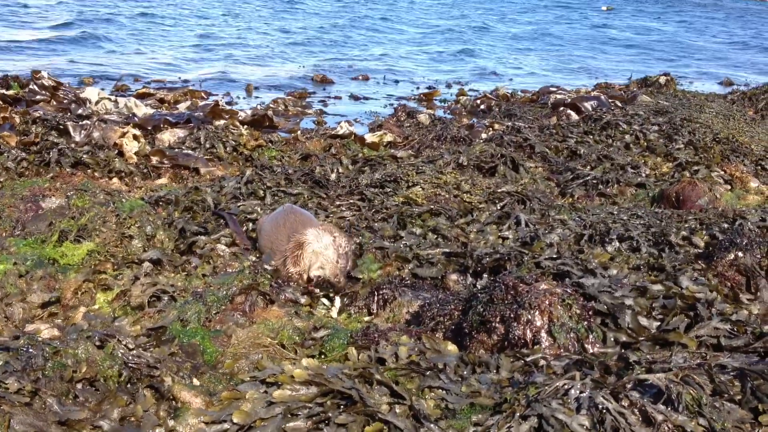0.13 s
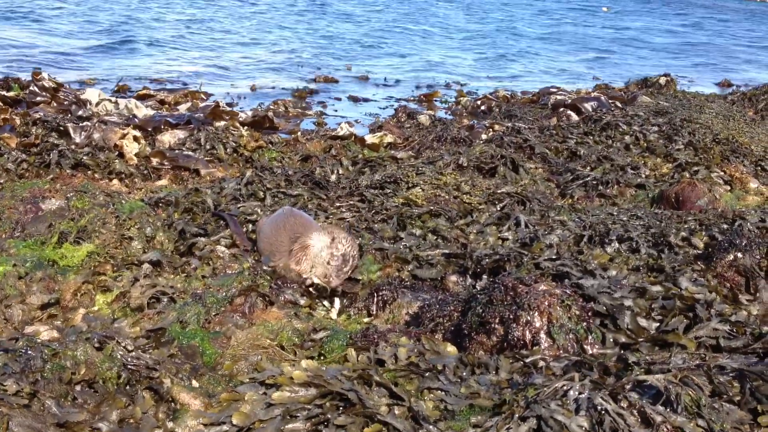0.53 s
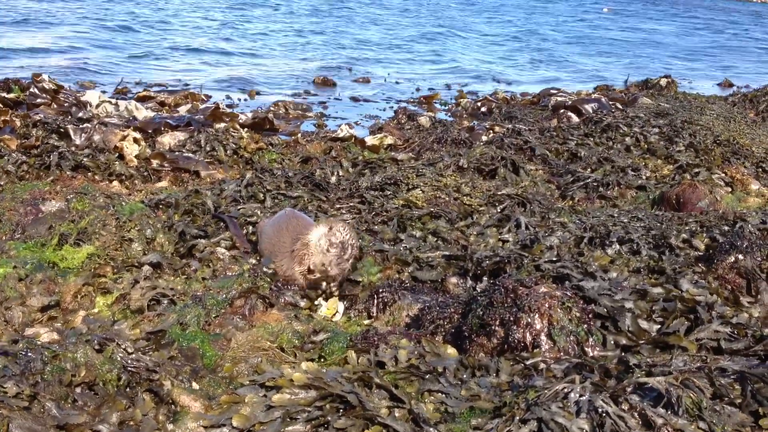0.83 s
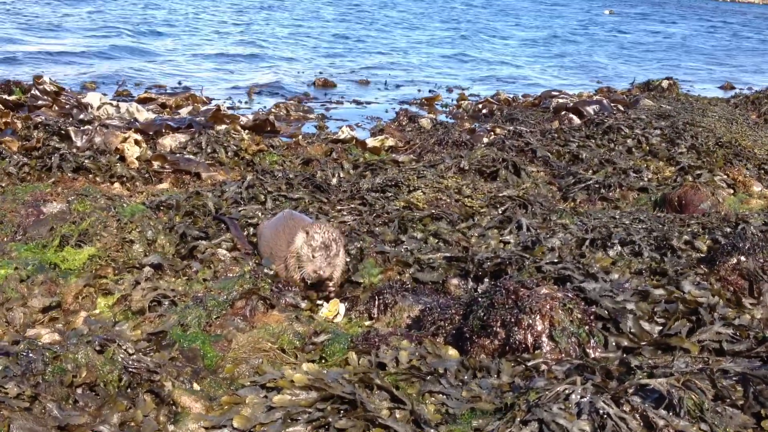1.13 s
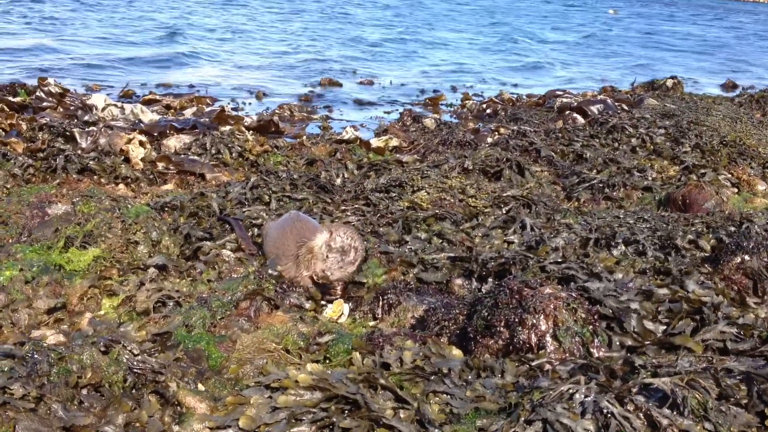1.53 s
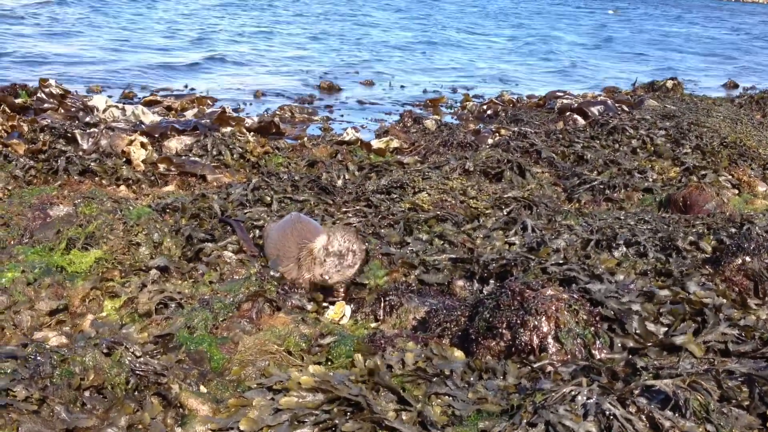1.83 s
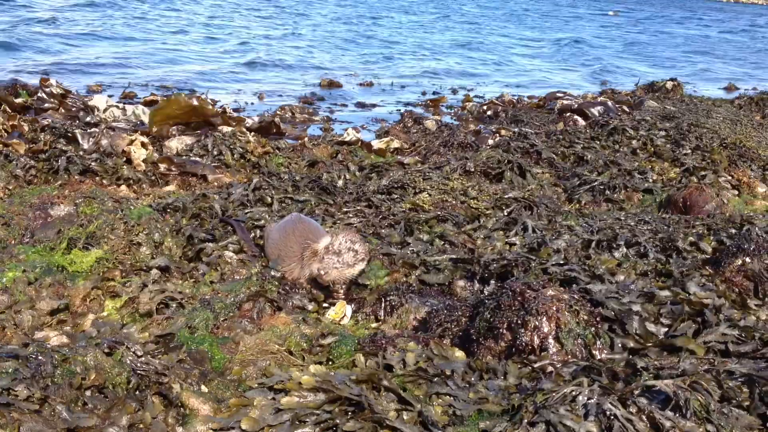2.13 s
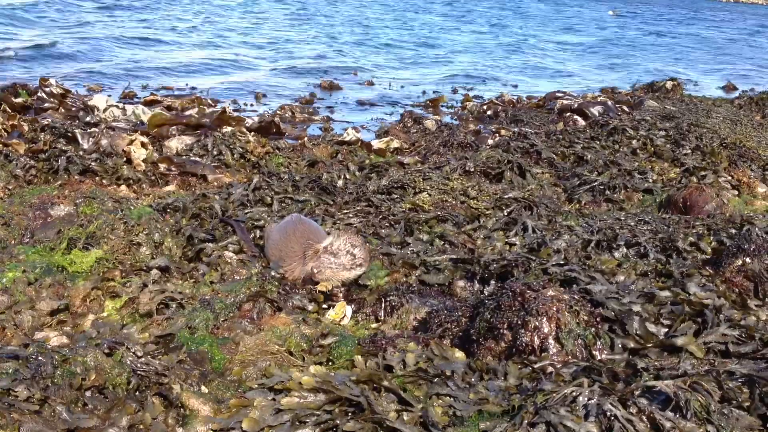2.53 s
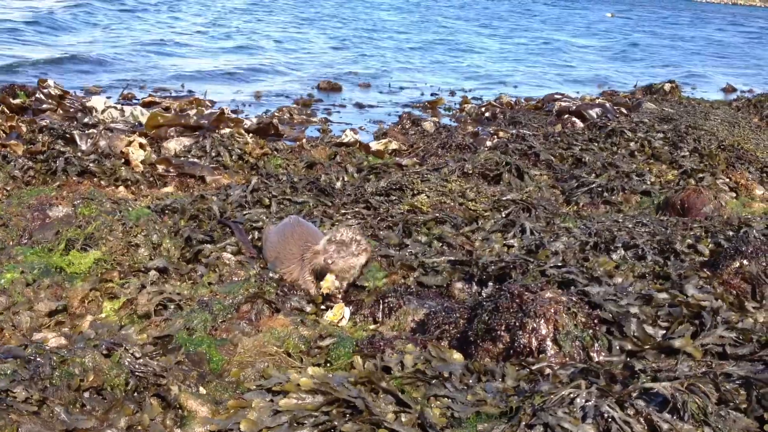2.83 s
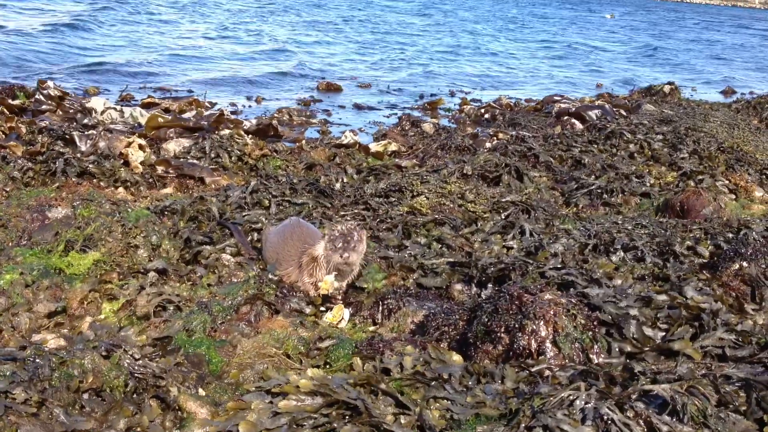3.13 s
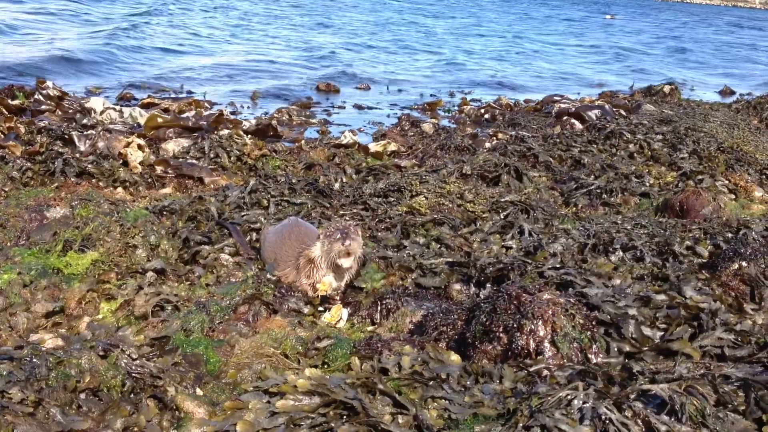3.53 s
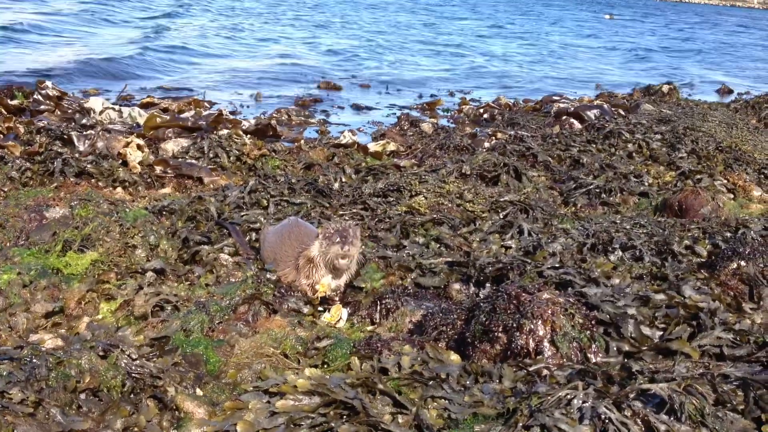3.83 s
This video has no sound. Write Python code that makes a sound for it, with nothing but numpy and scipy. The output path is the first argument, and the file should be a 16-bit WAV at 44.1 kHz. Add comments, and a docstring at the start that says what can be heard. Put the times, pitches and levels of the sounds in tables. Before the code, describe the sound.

Close wind buffeting on a handheld camera outdoors: dense low thuds and flaps early, a calmer middle with crisp case clicks around two seconds, then another gust after three; far water washes very quietly.

```python
"""Gusty wind on a camera microphone at a shore

A low noise rumble swells with the gusts, and a brighter flutter swells further; eddies thump the port
as thuds and flaps of noise. The hand-held plastic case ticks (filtered snaps), crackles (noise grains)
and squeaks faintly (gliding sines); far water hisses as filtered noise. The microphone cuts the deep bass.
"""
import sys
import numpy as np
from scipy import signal
from scipy.fft import rfft, irfft, next_fast_len
from scipy.io import wavfile
from scipy.ndimage import uniform_filter1d, minimum_filter1d, map_coordinates

SR = 44100
rng = np.random.default_rng(int(sys.argv[2]) if len(sys.argv) > 2 else 0)


def attenuation_scalar(level_db):
    """Turn a level in dB into a linear amplitude multiplier (20 dB per decade)."""
    decades = np.asarray(level_db, float) / 20
    return 10 ** decades


def bounce(signal):
    """Save signal as a 16-bit WAV file at the path given by the first command-line argument."""
    frames = np.transpose(np.atleast_2d(signal))
    limited = np.clip(frames, -1, 1)
    pcm = np.round(limited * 32767).astype(np.int16)
    wavfile.write(sys.argv[1], SR, pcm)


N = 176400

# bright resonances of the plastic case: hz [Hz], gain_db [dB, relative]
CASE_BANDS = [(2240, -48.5), (3800, -24), (4300, -24), (4750, -12), (5320, -17), (6190, -4), (7040, 1),
              (8620, 1), (9800, -25.5), (11500, -11), (13600, -11), (15200, -16)]


def unit(x):
    """Scaled to rms 1."""
    return x / np.sqrt(np.mean(x ** 2, -1, keepdims=True) + 1e-20)


def along(points, hz):
    """Gain of (Hz, dB) points joined on a log frequency axis."""
    f, v = np.transpose(points)
    return attenuation_scalar(np.interp(np.log(hz + 1), np.log(f + 1), v))


def curves(rows):
    """One value per sample for each column after the time."""
    s, *cols = np.transpose(rows)
    return [np.interp(np.arange(N) / SR, s, c) for c in cols]


def wobble(rate):
    """A smooth random curve, rate knots a second."""
    return map_coordinates(rng.standard_normal(N // 100), [np.arange(N) * rate / SR])


def filtered(x, response):
    """x times a response of frequency."""
    m = next_fast_len(x.shape[-1] + 8192)
    spectrum = rfft(x, m) * response(np.fft.rfftfreq(m, 1 / SR))
    return irfft(spectrum, m)[..., :x.shape[-1]]


def causal(points):
    """Minimum-phase impulse response of a spectrum, by folding its cepstrum."""
    cepstrum = irfft(np.log(along(points, np.fft.rfftfreq(4096, 1 / SR)) + 1e-6))
    folded = cepstrum * np.r_[1, 2 * np.ones(2047), 1, np.zeros(2047)]
    return irfft(np.exp(rfft(folded)))[:1024]


def placed(times, sounds, lead=0):
    """Rows of sound laid at their times, each starting lead samples early."""
    out = np.zeros(N + 2 * SR)
    for s, row in zip(times, sounds):
        out[SR + round(s * SR) - lead:][:len(row)] += row
    return out[SR:SR + N]


def peaked(rows, db):
    """Each row brought to its peak level."""
    return rows / np.abs(rows).max(-1, keepdims=True) * attenuation_scalar(db)[:, None]


def wind():
    """Turbulence at the port: lumpy rumble, and a smoother flutter that gains more than the rumble in gusts."""
    # strength of the gusts: time_s [s], gust_db [dB, before each layer's trim]
    gusts = [(0, -21), (.18, -29.5), (.42, -28), (.7, -23), (.85, -30.5), (1.05, -24), (1.3, -25),
             (1.45, -25), (1.63, -31.5), (1.85, -38), (2.0, -32.5), (2.25, -24.5), (2.45, -36), (2.65, -41),
             (2.95, -34.5), (3.2, -28.5), (3.4, -27), (3.69, -39), (4, -28.5)]
    # colour of the rumble: hz [Hz], gain_db [dB, relative]
    rumble_colour = [(15, -60), (25, -9.5), (64, -15.5), (76, -7), (189, 0), (452, -16.5), (708, -29),
                     (823, -30), (1170, -46), (1980, -120)]
    # colour of the flutter: hz [Hz], gain_db [dB, relative]
    flutter_colour = [(35, -53), (60, -46), (135, -6), (299, 4), (365, -9), (470, -7), (1370, -36),
                      (1490, -46.5), (4500, -68), (9900, -120)]
    rumble_trim_db, flutter_trim_db = 2.5, -12.5
    flutter_grows = 1.24  # dB of flutter per dB of rumble
    lumpy_db = 3  # depth of the rumble's random swells

    low_db, = curves(gusts)
    high_db = low_db.max() + flutter_grows * (low_db - low_db.max())
    swell = wobble(12) + .6 * wobble(45)
    lumps = attenuation_scalar(lumpy_db * swell) * rng.standard_normal(N)
    rumble = unit(filtered(lumps, lambda hz: along(rumble_colour, hz)))
    flutter = unit(filtered(rng.standard_normal(N), lambda hz: along(flutter_colour, hz)))
    return attenuation_scalar(low_db + rumble_trim_db) * rumble + attenuation_scalar(high_db + flutter_trim_db) * flutter


def eddy_layer(burst, colour):
    """Bursts through a causal filter, with the filter's own delay taken out."""
    impulse = causal(colour)
    delay = np.argmax(np.abs(impulse))
    return signal.fftconvolve(burst, impulse[None], axes=1)[:, delay:][:, :burst.shape[1]]


def thumps():
    """Each eddy is one push in a burst of turbulence: a dull thud with a brighter flap in its middle."""
    # eddies that thump the port: time_s [s], thud_peak_db [dB], flap_peak_db [dB],
    # length_s [s, decay time constant before limits]
    eddies = [(0.039, -13, -23, 0.0087), (0.175, -8.5, -28.5, 0.021), (0.212, -14, -13, 0.044),
              (0.253, -8.5, -16.5, 0.037), (0.285, -3.5, -17, 0.018), (0.302, -3.5, -2, 0.0081),
              (0.318, -5.5, -13.5, 0.02), (0.381, -4.5, -9, 0.012), (0.398, -5.5, -28, 0.011),
              (0.418, -3.5, -10.5, 0.015), (0.452, -11.5, -14, 0.0056), (0.533, -10, -35, 0.017),
              (0.565, -5, -18, 0.032), (0.584, -9.5, -9, 0.015), (0.617, -8.5, -5, 0.006),
              (0.629, -7, -8.5, 0.0087), (0.642, -5.5, -8, 0.0064), (0.665, 6, 2.5, 0.011),
              (0.676, 3, -9, 0.0063), (0.69, -9.5, -19, 0.021), (0.714, 4.5, -3.5, 0.01),
              (0.74, -7, -1, 0.015), (0.762, -1, -13, 0.0017), (0.772, -16, -28, 0.014),
              (0.786, 4.5, 1.5, 0.008), (0.894, -9, -24.5, 0.0086), (1.103, -5.5, -8, 0.0037),
              (1.124, -13.5, -12.5, 0.0059), (1.136, -8, -11.5, 0.012), (1.212, -12, -27, 0.047),
              (1.256, -9.5, -4.5, 0.014), (1.273, -9.5, -22, 0.0044), (1.28, -15, -7, 0.0072),
              (1.342, -12, -35, 0.011), (1.381, -16, -11.5, 0.0076), (1.415, -16, -21.5, 0.0073),
              (1.471, -8.5, -9, 0.0067), (1.493, -9.5, -23, 0.01), (1.549, -9.5, -2, 0.0098),
              (1.703, -16, -54, 0.0066), (1.804, -22, -43, 0.0088), (1.912, -13.5, -25, 0.0027),
              (2.01, -16.5, -43, 0.015), (2.144, -7.5, -13, 0.0064), (2.15, -6.5, -29, 0.0085),
              (2.187, -12.5, -36, 0.0077), (2.304, -12, -27, 0.013), (2.316, -12, -26.5, 0.022),
              (2.358, -14, -20.5, 0.011), (2.819, -7.5, -17.5, 0.0011), (3.064, -16, -45, 0.0054),
              (3.081, -10, -15.5, 0.0063), (3.103, -16, -32, 0.0058), (3.244, -5.5, -13.5, 0.011),
              (3.279, -17.5, -25, 0.019), (3.319, -5, 7, 0.0055), (3.349, -8.5, -33, 0.046),
              (3.36, -11, -1, 0.019), (3.371, -10, -9.5, 0.038), (3.392, -18, -6.5, 0.0051),
              (3.498, -12, -18.5, 0.0091), (3.547, -13.5, -41, 0.048), (3.662, -12, -21, 0.0074),
              (3.733, -19, -53, 0.0038), (3.96, -9, -12.5, 0.01)]
    # colour of the thud: hz [Hz], gain_db [dB, relative]
    dull = [(35, -42), (60, -33), (110, 0), (180, 4), (300, 2.5), (500, -5), (900, -25.5), (1600, -51.5),
            (3000, -64.5), (5500, -120)]
    # colour of the flap: hz [Hz], gain_db [dB, relative]
    sharp = [(60, -35), (150, -11), (300, -3.5), (480, -2), (850, -11.5), (1600, -25), (2800, -45.5),
             (5000, -75.5), (9000, -120)]
    rise_s = 0.0062  # time constant of the thud's swell
    flap_share = 0.76  # flap time constant as a share of the thud's decay
    thud_core, flap_core = 0.92, 1.38  # strength of the clean push in each layer

    s, thud_db, flap_db, length = np.transpose(eddies)
    lead = SR // 20
    t = np.arange(-lead, SR // 10) / SR
    length = np.clip(length, .002, .04)[:, None]
    air = rng.standard_normal((len(s), 2, len(t)))
    push = (t == 0) * -np.sqrt(SR * rise_s)  # one clean suck at the heart

    thud_shape = np.exp(np.where(t < 0, t / rise_s, -t / length))
    flap_shape = np.exp(-np.abs(t) / (flap_share * length))
    thud = eddy_layer(thud_shape * air[:, 0] + thud_core * push, dull)
    flap = eddy_layer(flap_shape * air[:, 1] + flap_core * push, sharp)
    return placed(s, peaked(thud, thud_db) + peaked(flap, flap_db), lead=lead)


def ticks():
    """A snap of noise through the case: bright bands, a low ring, a fizz after."""
    # ticks of the case: time_s [s], peak_db [dB, bright part], ring_db [dB, ring peak re bright peak]
    snaps = [(0.063, -41, -14), (0.0965, -34, -8), (0.1554, -36.5, -12), (0.205, -47, 9), (0.217, -29, -3),
             (0.2226, -28.5, -3), (0.2767, -35, -2), (0.31, -35.5, -24), (0.3728, -16, -23),
             (0.414, -42, -8), (0.5091, -32.5, -10), (0.629, -40.5, -13), (0.669, -29, -3),
             (0.691, -31.5, -23), (0.7006, -43, -22), (0.712, -37, -14), (0.7214, -26.5, -16),
             (0.7497, -37.0, -18), (0.7604, -36.5, -14.5), (0.7804, -35, 6), (0.869, -43, -18),
             (0.934, -41, -13), (1.0885, -38.5, -17), (1.1333, -31.5, -18), (1.5582, -41, -7),
             (1.653, -36, -17), (1.6581, -13, -13.5), (1.8448, -36.5, -12), (2.0599, -24.5, -18),
             (2.1025, -26, -10.5), (2.119, -33, -14), (2.1443, -28.5, -31), (2.1758, -40, -23),
             (2.1927, -36, -23), (2.1993, -13, -13), (2.2128, -29, -29.0), (2.3303, -38, -14),
             (2.347, -43, -13), (2.365, -32, -12), (2.422, -39, -5), (2.5646, -32, -10), (2.572, -27, -23),
             (2.591, -35, -22.0), (2.5974, -32.5, -11), (2.6105, -41, -18), (2.6174, -31, -12),
             (2.6344, -28, -9.5), (3.03, -40, -8), (3.0571, -30, -7), (3.41, -54.5, 18.5),
             (3.617, -45.5, -18), (3.873, -22.5, 2)]
    # low ring of the case: centre_hz [Hz], width_hz [Hz], gain_db [dB, relative]
    shell = [(1950, 245, -8), (2390, 90, -4), (3120, 370, -10)]
    snap_t60, fizz_t60, fizz_db = 0.0022, 0.022, -20  # s, s, dB under the snap
    crack, crack_at = 2, 12  # one clean crack: height, samples into the snap
    tilt_db = 1.5  # each tick leans bright or dull
    ring_top_hz = 3500  # the low ring rolls off above this

    s, db, ring_db = np.transpose(snaps)
    t = np.arange(SR // 10) / SR
    decay = attenuation_scalar(-60 * t / snap_t60) + attenuation_scalar(fizz_db - 60 * t / fizz_t60)
    attack = 1 - np.exp(-(t / 0.00025) ** 2)
    snap = decay * attack * rng.standard_normal((len(s), len(t)))
    snap[:, crack_at] += crack * np.sign(snap[:, 1])

    lean, ripple, phase = rng.standard_normal((3, len(s), 1))

    def tilt(hz):
        slope = lean * np.tanh((hz - 9500) / 2000)
        waves = 1.2 * ripple * np.sin(hz / 900 + 3 * phase)
        return attenuation_scalar(tilt_db * (slope + waves))

    def shell_response(f):
        total = 0
        for k, (centre, width, gain_db) in enumerate(shell):
            band = 1j * f * width / (centre * centre - f * f + 1j * f * width)
            total = total + (-1) ** k * attenuation_scalar(gain_db) * band  # neighbours in opposite polarity
        return total / (1 + (f / ring_top_hz) ** 8)

    bright = signal.fftconvolve(snap, causal(CASE_BANDS)[None], axes=1)[:, :len(t)]
    bright = filtered(bright, tilt)
    ring = filtered(snap, shell_response)
    return placed(s, peaked(bright, db) + peaked(ring, db + ring_db))


def crackle():
    """Tiny random ticks of the case under the grip: noise grains of random size on a thin fizz."""
    # fine crackle: time_s [s], level_db [dB]
    crackle_level = [(0, -62.5), (.2, -62.5), (.222, -42), (.242, -71), (.3, -71.5), (.62, -69.5),
                     (.72, -59), (.85, -75.5), (2.2, -67.5), (2.32, -62.5), (2.5, -63), (2.62, -61),
                     (2.7, -67), (2.95, -69.5), (3.05, -60.5), (3.12, -69), (3.3, -71), (4, -73)]
    hits_per_s, spread_db = 90, 5
    fizz, grain_s = 1.3, .002  # steady share; half the length of a grain's window

    level_db, = curves(crackle_level)
    chance, size, noise = rng.random(N), rng.standard_normal(N), rng.standard_normal(N)
    hits = (chance < hits_per_s / SR) * attenuation_scalar(spread_db * size)
    grains = signal.fftconvolve(hits, np.hanning(round(2 * grain_s * SR)))[:N]
    rough = (unit(np.abs(grains)) + fizz) * noise
    return attenuation_scalar(level_db) * unit(filtered(rough, lambda hz: along(CASE_BANDS, hz)))


def squeaks():
    """Faint rubbing of the case: thin, wavering sine overtones that glide, and one thin steady tone."""
    # squeaks: start_s [s], length_s [s], start_hz [Hz, base pitch], end_hz [Hz, base pitch],
    # level_db [dB, before overtone trim]
    glides = [(0.118, 0.04, 2120, 1820, -67), (0.156, 0.058, 1830, 2040, -65),
              (2.388, 0.026, 2080, 1940, -68), (2.44, 0.056, 1950, 2000, -67)]
    # trim of overtones 2 to 4 of the base pitch: gain_db [dB]
    overtones = [-7, -1, -3]
    # the steady tone: start_s [s], length_s [s], pitch_hz [Hz], level_db [dB]
    whistle = (3.93, 0.1, 2740, -64)
    flicker_db = 4  # unsteady level of each overtone

    t = np.arange(N) / SR
    waver = 1 + 0.026 * wobble(200)

    def gate(u):
        return np.sin(np.pi * u) ** .5

    s, length, hz, db = whistle
    out = attenuation_scalar(db) * gate(np.clip((t - s) / length, 0, 1)) * np.sin(2 * np.pi * hz * t)
    for s, length, start_hz, end_hz, db in glides:
        u = np.clip((t - s) / length, 0, 1)
        pitch = (start_hz + (end_hz - start_hz) * u) * waver
        phase = 2 * np.pi * np.cumsum(pitch) / SR
        for k, trim_db in enumerate(overtones, 2):
            level = attenuation_scalar(db + trim_db + flicker_db * wobble(89))
            out += gate(u) * level * np.sin(k * phase)
    return out


def water():
    """Far wash of a wave: filtered noise, gently unsteady."""
    # colour of the wash: hz [Hz], gain_db [dB, relative]
    wash_colour = [(410, -43.5), (700, -7.5), (1000, 4.5), (2010, 0.5), (3330, -9.5), (4840, -12.5),
                   (6940, -23), (15200, -39.5)]
    # swell of the wash: time_s [s], level_db [dB, before the small wobbles]
    wash_level = [(0, -53.5), (.5, -54.5), (.8, -54.5), (1.0, -49), (1.15, -51.5), (1.45, -52.5),
                  (1.65, -57), (2.55, -57.5), (3.0, -57.5), (3.4, -56), (3.65, -59.5), (4, -58)]
    slow_db, fast_db = 1, 1.3  # depth of the wobbles

    level_db, = curves(wash_level)
    wash = unit(filtered(rng.standard_normal(N), lambda hz: along(wash_colour, hz) * (hz > 600)))
    return attenuation_scalar(level_db + slow_db * wobble(8.27) + fast_db * wobble(25.22)) * wash


def microphone(sound):
    """Adds the microphone's own steady hiss, then cuts deep bass and top treble."""
    hiss_db = -70.5  # white level, before the shaping below
    notch_hz, notch_width_hz, notch_db = 10300, 1600, -1  # dip in the hiss
    bass_cut_hz, top_hz, edge_hz = 83, 15500, 600

    def hiss_colour(hz):
        dip = np.exp(-((hz - notch_hz) / notch_width_hz) ** 2)
        return (hz > 3000) * attenuation_scalar(notch_db * dip)

    hiss = attenuation_scalar(hiss_db) * filtered(rng.standard_normal(N), hiss_colour)
    bass_cut = signal.butter(2, bass_cut_hz, "high", fs=SR, output="sos")
    cut = signal.sosfilt(bass_cut, sound + hiss)
    return filtered(cut, lambda hz: np.clip((top_hz - hz) / edge_hz, 0, 1) ** 2)


def limiter(x):
    """Fast look-ahead limiter: the gain dips smoothly around peaks over the ceiling."""
    ceiling, hold = .95, 300  # full scale, samples
    need = np.minimum(1, ceiling / (np.abs(x) + 1e-9))
    need = minimum_filter1d(need, size=2 * hold)
    gain = uniform_filter1d(uniform_filter1d(need, size=hold), size=hold)
    return x * gain


def scene():
    """Everything at one microphone."""
    return (wind() + thumps() + ticks() + crackle() + squeaks() + water())[None]


def low_pass(x):
    """Removes everything above the highest recorded frequency."""
    return signal.sosfilt(signal.butter(12, 15390, fs=SR, output="sos"), x)


def record(dry):
    """The microphone, a fast limiter and a soft end."""
    fade_s = .004
    limited = limiter(microphone(dry))
    to_end = np.clip(np.arange(N)[::-1] / (fade_s * SR), 0, 1)
    mix = limited * np.sin(np.pi / 2 * to_end) ** 2
    return low_pass(mix)


dry = scene()
out = record(dry)
bounce(out)
```